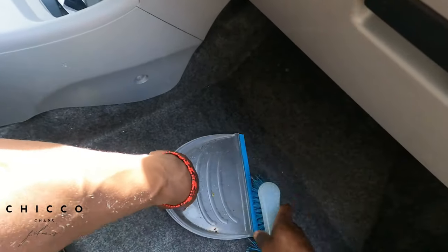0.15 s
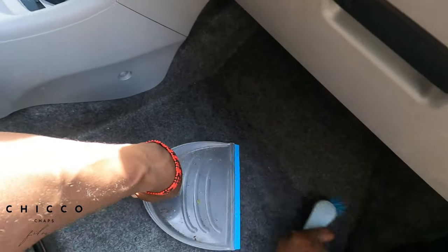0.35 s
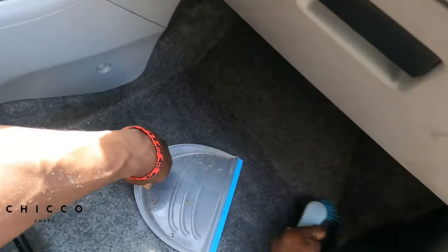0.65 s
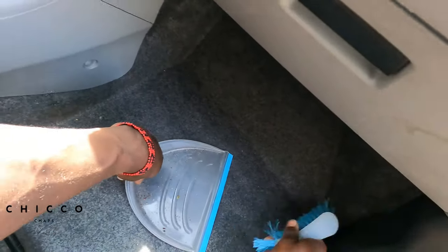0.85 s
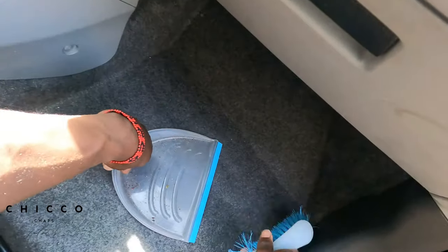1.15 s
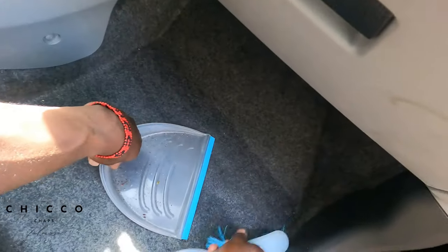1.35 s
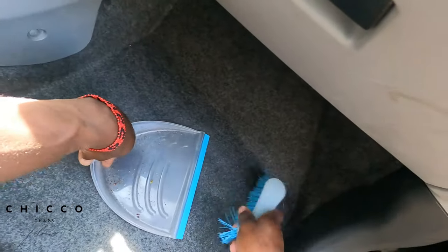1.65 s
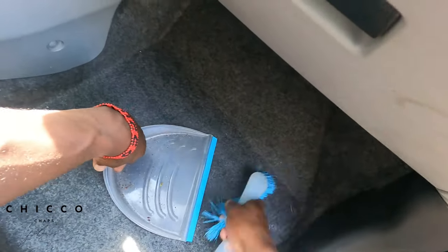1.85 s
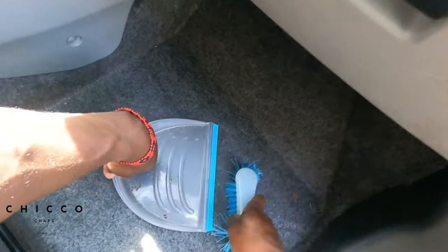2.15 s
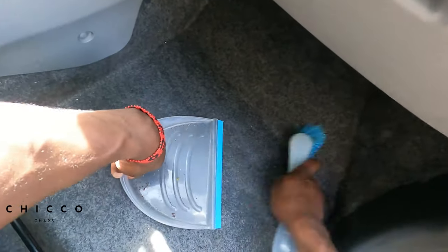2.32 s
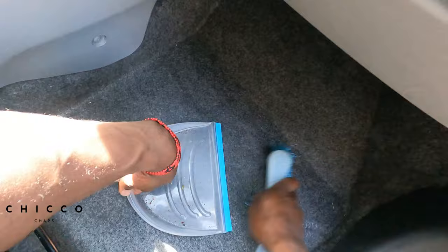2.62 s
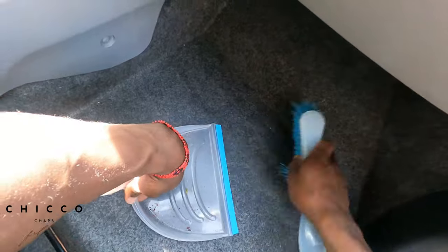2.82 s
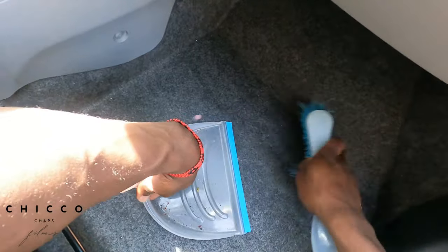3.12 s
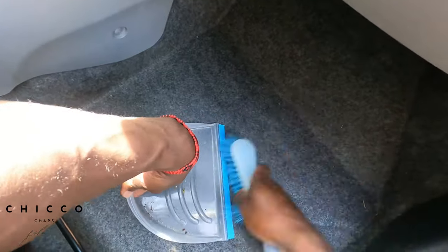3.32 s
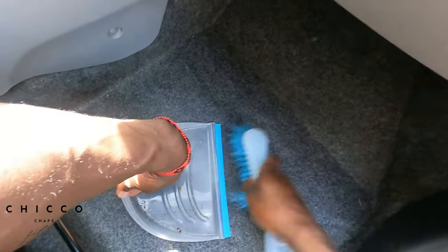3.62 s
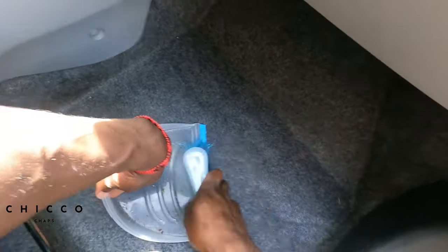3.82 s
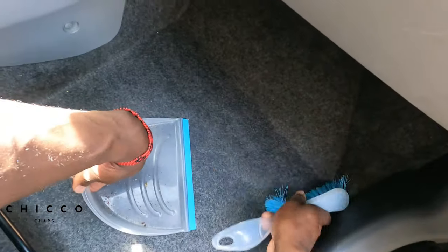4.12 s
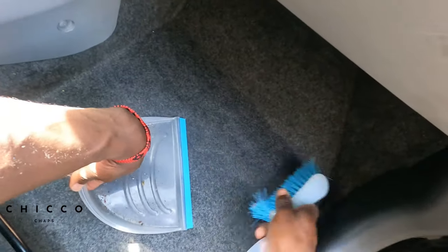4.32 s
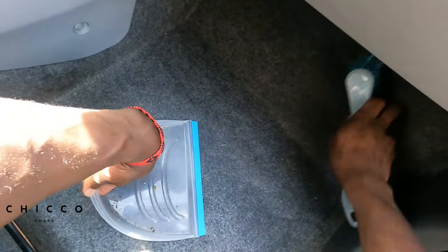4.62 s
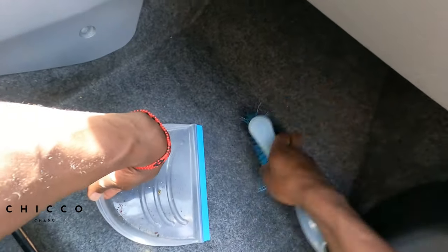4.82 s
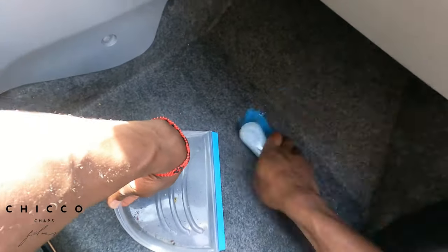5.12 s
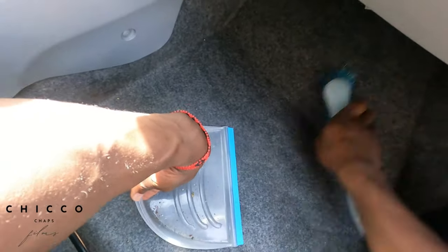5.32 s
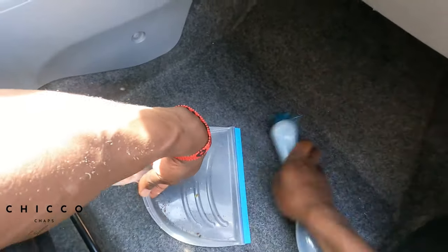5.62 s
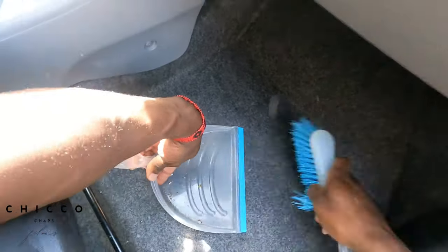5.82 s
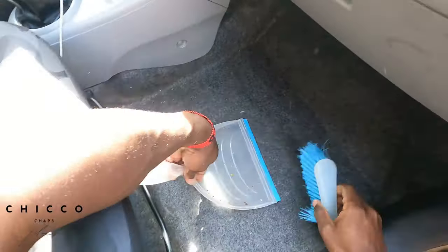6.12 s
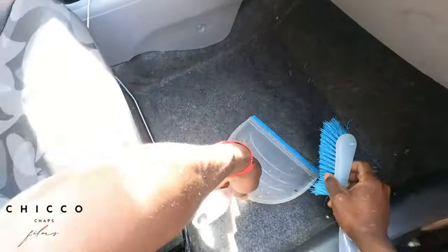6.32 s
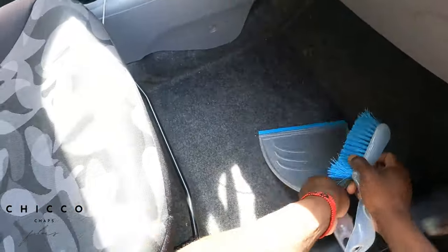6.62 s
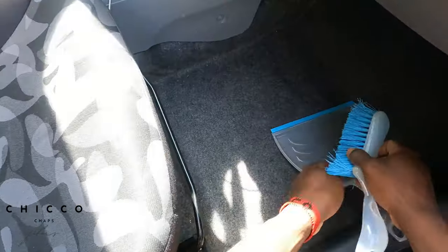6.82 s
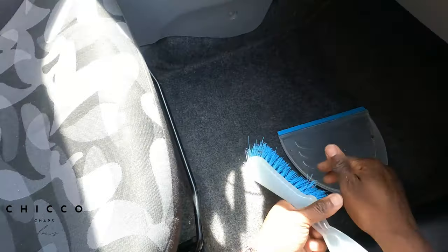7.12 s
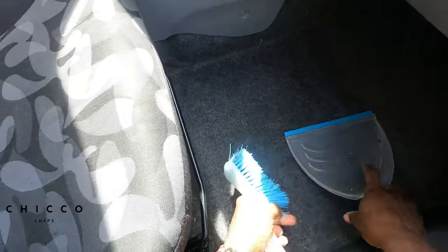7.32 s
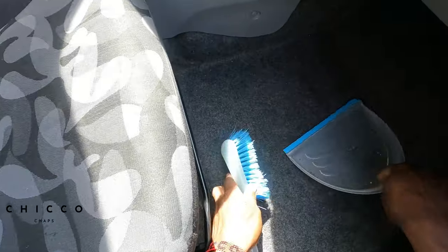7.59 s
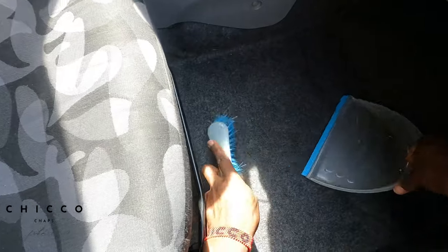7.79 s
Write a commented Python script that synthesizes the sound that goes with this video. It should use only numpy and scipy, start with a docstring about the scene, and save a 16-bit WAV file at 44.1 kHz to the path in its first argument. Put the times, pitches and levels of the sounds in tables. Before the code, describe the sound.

A stiff hand brush scrubs a car's carpeted floor in short strokes, about three a second, each a dull knock followed by a scratchy hiss. After roughly six seconds the scrubbing stops and the brush clacks against a plastic dustpan. The tools rustle and bump as they change hands, air buffets the close microphone, and the pan scrapes lightly over the carpet. A low rumble fills the small cabin throughout.

```python
"""Short scrubbing strokes, each a knock and a hiss: a stiff hand brush on the carpeted floor of a car.
The floor panel knocks as the brush lands, then the bristles flick through the pile towards a plastic
dustpan. At the end brush and pan clack together and are shifted about, and air buffets the microphone.
A low cabin rumble lies under it all."""
import sys
import numpy as np
from scipy import signal
from scipy.fft import rfft, irfft, next_fast_len
from scipy.io import wavfile

SR = 44100
rng = np.random.default_rng(int(sys.argv[2]) if len(sys.argv) > 2 else 0)


def to_wav(s):
    """Save 16-bit WAV."""
    ch = np.atleast_2d(s).T  # columns
    pcm = np.round(np.clip(ch, -1, 1) * 32767)  # PCM
    wavfile.write(sys.argv[1], SR, pcm.astype(np.int16))


N = 350595
TIME_S = np.arange(N) / SR

# Spectra. Each row: frequency in Hz, relative spectral density in dB.
CABIN_SPECTRUM = [(20, -2), (45, -7), (140, -16), (190, -24.5), (260, -27.5), (520, -36.5), (1050, -37),
                  (1750, -49.5), (3500, -57), (8000, -63)]
GUST_SPECTRUM = [(25, 5.5), (130, -4), (250, -13.5), (500, -30), (1000, -30.5), (1600, -64)]
RUSTLE_SPECTRUM = [(250, -16.5), (560, -10), (850, -17.5), (1200, -16), (3000, -28), (7000, -38)]
PAN_DRAG_SPECTRUM = [(450, 0), (900, -1.5), (1200, 5.5), (1500, -3), (2700, -8.5), (4000, -10.5),
                     (7000, -28.5)]
CLACK_SPECTRUM = [(400, -2.5), (750, 4), (1100, 10), (1600, 1.5), (2300, -7), (5000, -14.5)]
BOOM_SPECTRUM = [(70, -16), (140, 4.5), (260, -5.5), (400, -8.5)]
KNOCK_SPECTRUM = [(220, -19.5), (420, -2), (560, -10), (900, -15), (1500, -46)]
BRUSH_BACK_SPECTRUM = [(130, 2.5), (270, -6), (440, 1.5), (750, -4), (930, 1), (1200, 3.5), (1700, -3.5),
                       (2300, -23.5), (2800, -12)]
BRISTLE_SPECTRUM = [(1700, -3.5), (2100, -2.5), (2850, -6.5), (3600, -2), (4700, -1), (7600, -4.5),
                    (8300, -10), (12100, -19), (14200, -31), (15500, -63.5)]
# Stereo width. Each row: frequency in Hz, side against mid in dB.
STEREO_WIDTH = [(60, -32.5), (380, -18.5), (1000, -13), (2380, -6.5), (6000, -12.5), (15000, -10)]
# Dustpan modes. Each row: frequency in Hz, relative level in dB, T60 in seconds.
PAN_MODES = [(326, 4.5, 0.15), (518, 19, 0.031), (680, -3, 0.15), (1290, -41, 0.056), (2230, 9, 0.021),
             (3030, 3, 0.019)]

# Event levels below are relative; each source adds its own offset.
# Air gusts and pushes of the pan. Each row: start of hold in seconds, hold in seconds, level in dB.
AIR_GUSTS = [(1.15, 0.034, -23), (6.72, 0.094, -23.5), (7.08, 0.475, -19.5)]
PAN_SLIDES = [(7.645, 0.031, -31.5), (7.76, 0.055, -38), (7.86, .1, -41)]
# Tools and arms rubbing. Each row: time in seconds, rustle in dB, crisp edge in dB.
RUB_LEVELS = [(6.04, -42, -46), (6.186, -42.5, -49.5), (6.59, -43.5, -52.5), (7.152, -57, -60),
              (7.264, -68, -68), (7.482, -49.5, -83), (7.6, -44, -72)]
# Taps on the pan and light ticks, all sounded through the pan's modes: the loud rows strike the pan, the faint
# ones (4.509, 5.047, 5.957, 6.034, 6.355 s) are light bristle ticks or the brush touching just before a
# landing. Each row: start in seconds, ring in dB.
TAPS_AND_TICKS = [(.639, -42), (4.509, -37), (5.047, -62), (5.957, -44.5), (6.034, -54), (6.065, -23),
                  (6.148, -26), (6.175, -20.5), (6.221, -22), (6.256, -36), (6.355, -46)]
# Brush body bumping the floor. Each row: start in seconds, knock in dB.
BODY_BUMPS = [(1.128, -14.5), (1.892, -19.5), (1.952, -21.5), (4.802, -21.5), (5.491, -23.5), (6.883, -31)]
# Extra pushes, brush already down. Each row: time of top speed in seconds, length in seconds, hiss in dB.
BRUSH_DRAGS = [(0.01, 0.72, -40.5), (1.047, 0.054, -37.5), (1.224, 0.097, -38.5), (1.433, 0.25, -44),
               (1.721, 0.14, -27.5), (4.205, 0.21, -47), (4.952, .08, -28), (5.293, 0.096, -29)]
# Strokes. Each row: landing in seconds, knock in dB, clack in dB, speed-up in seconds,
# slow-down in seconds, hiss in dB, hiss on the way back in dB.
BRUSH_STROKES = [(.122, -21.5, -22, 0.072, 0.13, -23, -57.5), (.453, -23, -26, 0.086, 0.092, -25, -42),
                 (.739, -22.5, -24, 0.13, 0.093, -24.5, -50),
                 (1.068, -23.5, -25.5, 0.084, 0.14, -28.5, -60.5), (1.39, -25.5, -23, 0.2, 0.17, -23, -71),
                 (1.875, -40, -26.5, 0.11, 0.13, -23, -48), (2.165, -26.5, -26.5, 0.075, 0.14, -22, -56),
                 (2.431, -16, -27.5, 0.072, 0.14, -22.5, -47), (2.728, -16, -27.5, 0.048, 0.14, -23, -57.5),
                 (3.022, -18.5, -28.5, 0.059, 0.13, -22, -74), (3.311, -19, -26, 0.046, 0.16, -22, -62),
                 (3.575, -19.5, -25.5, 0.068, 0.12, -21, -74), (3.863, -18, -27.5, 0.054, 0.11, -22, -61),
                 (4.237, -26, -23, 0.11, 0.097, -25.5, -55), (4.52, -20, -25.5, 0.073, .09, -23.5, -58.5),
                 (4.77, -25, -21.5, 0.12, 0.09, -22.5, -56), (5.129, -16, -32.5, 0.1, 0.12, -25, -88),
                 (5.426, -21.5, -33.5, 0.1, 0.12, -23.5, -78), (5.731, -27.5, -29, 0.057, .11, -22.5, -59)]


def from_db(db):
    """Decibels to gain."""
    return 10 ** (np.asarray(db) / 20)


def response(spectrum, size):
    """Gain per FFT bin; falls 36 dB per octave outside the spectrum's span."""
    hz, db = np.transpose(spectrum)
    bin_hz = np.maximum(np.arange(size // 2 + 1) * SR / size, 1)
    outside_oct = np.maximum(np.log2(hz[0] / bin_hz), 0) + np.maximum(np.log2(bin_hz / hz[-1]), 0)
    return from_db(np.interp(np.log(bin_hz), np.log(hz), db) - 36 * outside_oct)


def colour(x, spectrum):
    """Filter by a spectrum; rms 1."""
    size = next_fast_len(x.shape[-1])
    shaped = irfft(rfft(x, size) * response(spectrum, size), size)[..., :x.shape[-1]]
    return shaped / np.sqrt(np.mean(shaped ** 2) + 1e-20)


def drift(rate_hz, size=N):
    """Slow random wander; rms 1."""
    return colour(rng.standard_normal(size), [(1, 0), (rate_hz, 0)])


def stereo(mid, side):
    """Mid and side to left and right; width depends on frequency."""
    hz, db = np.transpose(STEREO_WIDTH)
    size = next_fast_len(len(side))
    share = from_db(np.interp(np.arange(size // 2 + 1) * SR / size, hz, db))
    return mid + irfft(rfft(side, size) * share, size)[:len(side)] * np.array([[1], [-1]])


def noise(spectrum, size=N):
    """Coloured stereo noise."""
    return stereo(*colour(rng.standard_normal((2, size)), spectrum))


def flicks(spectrum, per_s, spread_db, size=N):
    """Fibres snap free at random with uneven force, all through the same resonances."""
    force = from_db(spread_db * np.minimum(rng.exponential(1, (2, size)), 4))
    clicks = (rng.random((2, size)) < per_s / SR) * force * rng.choice([-1, 1], (2, size))
    return stereo(*colour(clicks, spectrum))


def burst(spectrum, rise_s, t60_s):
    """A cluster of contacts: fast build, exponential decay."""
    t = TIME_S[:SR // 8]
    return noise(spectrum, len(t)) * (1 - np.exp(-t / rise_s)) * from_db(-60 * t / t60_s)


def swells(rows, attack_s, t60_s):
    """Summed gain of events that ramp up, hold and decay."""
    gain = np.zeros(N)
    for start_s, hold_s, db in rows:
        ramp = np.clip(1 + (TIME_S - start_s) / attack_s, 0, 1)
        gain += ramp * from_db(db - 60 * np.maximum(TIME_S - start_s - hold_s, 0) / t60_s)
    return gain


def add(out, start_s, sound, gain_db=0):
    """Mix a short sound into out."""
    start = max(int(start_s * SR), 0)
    out[:, start:start + sound.shape[-1]] += from_db(gain_db) * sound[..., :N - start]


def cabin_rumble(rumble_db=-30, drone_hz=68.4, drone_db=-35.5):
    """Steady low rumble with a wavering drone."""
    drone = colour(rng.standard_normal(N), [(drone_hz * 0.77, -20), (drone_hz, 0), (drone_hz * 1.14, -20)])
    return from_db(rumble_db) * noise(CABIN_SPECTRUM) + from_db(drone_db) * drone


def cabin_reflections(x, t60_s, level_db):
    """Add the short cloud of echoes from door, console and glass."""
    t = TIME_S[:SR // 8]
    echoes = stereo(*rng.standard_normal((2, len(t)))) * from_db(-60 * t / t60_s) * (t > .002)
    echoes /= np.sqrt(np.sum(echoes ** 2) / 2)
    return x + from_db(level_db) * signal.fftconvolve(x, echoes, axes=1)[:, :N]


def air_buffeting(split_hz=220):
    """Low gusts at the microphone, partly different at each port; the upper band comes in soft bumps."""
    gust = noise(GUST_SPECTRUM) + from_db(-2) * colour(rng.standard_normal((2, N)), GUST_SPECTRUM)
    low = signal.sosfiltfilt(signal.butter(2, split_hz, fs=SR, output="sos"), gust)
    upper = (gust - low) * from_db(-2 + 2 * drift(rate_hz=39))
    return swells(AIR_GUSTS, attack_s=0.082, t60_s=0.18) * (low + upper)


def tool_shifting():
    """Uneven rubbing as the tools change hands, then the hollow pan is pushed over the pile."""
    times_s, *levels_db = np.transpose(RUB_LEVELS)
    rustle_db, edge_db = [np.interp(TIME_S, times_s, db, left=-120, right=-120) for db in levels_db]
    rustle = from_db(rustle_db + 6) * flicks(RUSTLE_SPECTRUM, per_s=3500, spread_db=2)
    edge = from_db(edge_db + 3.5) * flicks(BRISTLE_SPECTRUM, per_s=3200, spread_db=5)
    push = swells(PAN_SLIDES, attack_s=0.02, t60_s=0.23)
    pan = push * flicks(PAN_DRAG_SPECTRUM, per_s=12000, spread_db=1)
    return (rustle + edge + pan) * from_db(1.44 * drift(rate_hz=20))


def fumbles(start_s=7.088, every_s=0.078, knock_db=-34, count=7):
    """Soft bumps as the tools change hands. Each row: start in seconds, knock in dB."""
    return [(start_s + k * every_s + rng.normal(0, .005), knock_db + rng.normal(0, 1.9))
            for k in range(count)]


def dustpan_taps(hard_tap_db=-17.5):
    """Each tap snaps and rings the thin plastic, sharing its energy unevenly among the modes."""
    out, t = np.zeros((2, N)), TIME_S[:SR // 8]
    hz, mode_db, t60_s = np.transpose(PAN_MODES)[:, :, None]
    for start_s, ring_db in TAPS_AND_TICKS:
        snap_db = -22 + 0.31 * (ring_db - hard_tap_db)   # light taps mostly snap, hard ones ring
        strength = from_db(mode_db + rng.normal(0, 3, hz.shape)) * rng.choice([-1, 1], hz.shape)
        detune = 1 + rng.normal(0, 0.059, hz.shape)   # by hand and floor
        modes = strength * np.sin(2 * np.pi * hz * detune * t) * from_db(-60 * t / t60_s)
        add(out, start_s, modes.sum(axis=0) / np.linalg.norm(strength), ring_db + 12.5)
        add(out, start_s, burst(CLACK_SPECTRUM, rise_s=0.0001, t60_s=0.061), ring_db + 1)
        add(out, start_s, burst(BRISTLE_SPECTRUM, rise_s=0.00018, t60_s=0.024), snap_db)
    return out


def floor_wave(spectrum, delay_1khz_s):
    """Bending wave in the floor panel: highs arrive first, so the pitch falls; peak 1."""
    size = SR // 8
    hz = np.arange(size // 2 + 1) * SR / size
    dispersion = np.exp(-4j * np.pi * delay_1khz_s * np.sqrt(1000 * hz))
    wave = irfft(response(spectrum, size) * dispersion, size)
    wave *= np.interp(TIME_S[:size], [0, .001, .06, .1], [0, 1, 1, 0])
    return wave / np.abs(wave).max()


def brush_landings(boom_db_per_s=2.5, usual_clack_db=-23):
    """Landings and bumps: tips tick, plastic clacks, the floor panel knocks over a deep boom."""
    out = np.zeros((2, N))
    landings = [row[:3] for row in BRUSH_STROKES]
    bumps = [(start_s, db, db - 14.5) for start_s, db in BODY_BUMPS + fumbles()]
    for start_s, knock_db, clack_db in landings + bumps:
        boom_db = knock_db - 11 + boom_db_per_s * start_s   # grows as the work moves across the floor
        tick_db = -26.5 + 2 * (clack_db - usual_clack_db)
        delay_1khz_s = 0.002294 * from_db(rng.normal(0, 1))
        add(out, start_s, floor_wave(BOOM_SPECTRUM, delay_1khz_s), boom_db + 9.5)
        add(out, start_s, floor_wave(KNOCK_SPECTRUM, delay_1khz_s), knock_db + 7.5)
        add(out, start_s + 0.00461, burst(BOOM_SPECTRUM, rise_s=0.0035, t60_s=0.078), boom_db + 8.5)
        add(out, start_s + 0.00479, burst(KNOCK_SPECTRUM, rise_s=0.0034, t60_s=0.051), knock_db + 4)
        add(out, start_s, burst(CLACK_SPECTRUM, rise_s=0.00052, t60_s=0.064), clack_db + 8)
        add(out, start_s, burst(BRISTLE_SPECTRUM, rise_s=0.0001, t60_s=0.069), tick_db)
        for lag_s in rng.uniform(.015, 0.049, size=2):
            judder = burst(BRUSH_BACK_SPECTRUM, rise_s=0.0008, t60_s=0.043)
            add(out, start_s + lag_s, judder, clack_db - 0.5)
    return out


def angled(spectrum, spread_db, count=40):
    """Each new brush angle shifts the strength of the resonances at random."""
    hz, db = np.transpose(spectrum)
    fine_hz = np.geomspace(hz[0], hz[-1], count)
    fine_db = np.interp(np.log(fine_hz), np.log(hz), db)
    return np.transpose([fine_hz, fine_db + spread_db * rng.standard_normal(count)])


def bristle_sweep(rise_s, fall_s, hiss_db, press_db=0, usual_hiss_db=-22, split_hz=5000):
    """One sweep: the faster the brush, the denser and louder the flicks; the brush back rasps along."""
    t = TIME_S[:SR // 2]
    phase = np.interp(t, [0, rise_s, rise_s + fall_s], [0, np.pi / 2, np.pi])
    trail = (t > rise_s) * np.exp(-np.abs(t - rise_s) / (0.43 * fall_s))   # bent bristles trail on
    speed = np.maximum(np.sin(phase), trail)
    lean_db = 4.3 * np.cos(phase)   # the hand bears down, then lifts
    tuft_grip_db = drift(rate_hz=35.6, size=len(t))
    tip_bite_db = 0.99 * drift(rate_hz=53, size=len(t))
    tips_per_s = 5000 + 14000 * speed ** 2
    tips = flicks(angled(BRISTLE_SPECTRUM, spread_db=1.63), tips_per_s, spread_db=2.5, size=len(t))
    rasp = flicks(angled(BRUSH_BACK_SPECTRUM, spread_db=2.5), per_s=4000, spread_db=0.5, size=len(t))
    dull = signal.sosfiltfilt(signal.butter(1, split_hz, fs=SR, output="sos"), tips)
    bright = (tips - dull) * from_db(tip_bite_db)
    hiss = (dull * speed ** 2.9 + bright * speed ** 2.66) * from_db(hiss_db - 3 + tuft_grip_db)
    rasp_db = -25.5 + 0.62 * (hiss_db - usual_hiss_db) + press_db + lean_db + 2.2 * tuft_grip_db
    return hiss + rasp * speed ** 2 * from_db(rasp_db)


def brush_scrubbing(touch_lead_s=.014, usual_rise_s=0.058, last_period_s=0.37, overlap_s=0.061):
    """Bristles meet the pile just before each landing, sweep, then graze it on the way back."""
    out = np.zeros((2, N))
    lands_s = [row[0] for row in BRUSH_STROKES]
    periods_s = np.diff(lands_s, append=lands_s[-1] + last_period_s)
    for (land_s, _, _, rise_s, fall_s, hiss_db, back_db), period_s in zip(BRUSH_STROKES, periods_s):
        press_db = 20 * (rise_s - usual_rise_s)   # slow starters are pressed harder
        add(out, land_s - touch_lead_s, bristle_sweep(rise_s + touch_lead_s, fall_s, hiss_db, press_db))
        back_s = period_s - rise_s + overlap_s
        add(out, land_s + rise_s, bristle_sweep(back_s / 2, back_s / 2, back_db))
    for fastest_s, length_s, hiss_db in BRUSH_DRAGS:
        rise_s = min(length_s / 2, fastest_s)
        add(out, fastest_s - rise_s, bristle_sweep(rise_s, length_s / 2, hiss_db))
    return out


def scene():
    """Close brush work in a small padded cabin, with gusts and rumble."""
    work = brush_scrubbing() + brush_landings() + dustpan_taps() + tool_shifting()
    work = cabin_reflections(work, t60_s=0.032, level_db=-12.5)
    balance = from_db([[-.7], [-.1]])
    return work * balance + air_buffeting() + cabin_rumble()


def record(dry, cutoff_hz=15600):
    """Soft clip, then a steep low-pass."""
    lowpass = signal.ellip(10, .1, 80, cutoff_hz, fs=SR, output="sos")
    return signal.sosfilt(lowpass, 2 * np.tanh(dry / 2))


dry = scene()
out = record(dry)
to_wav(out)
```